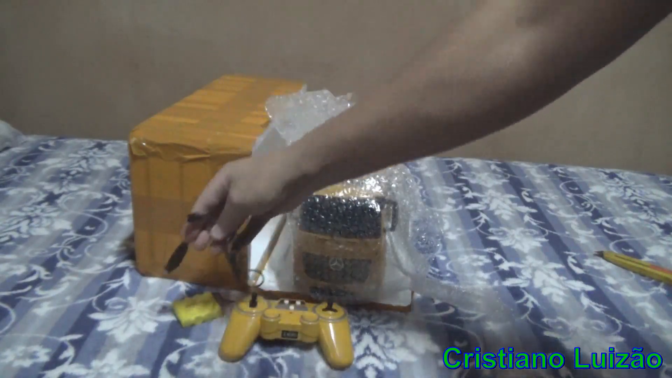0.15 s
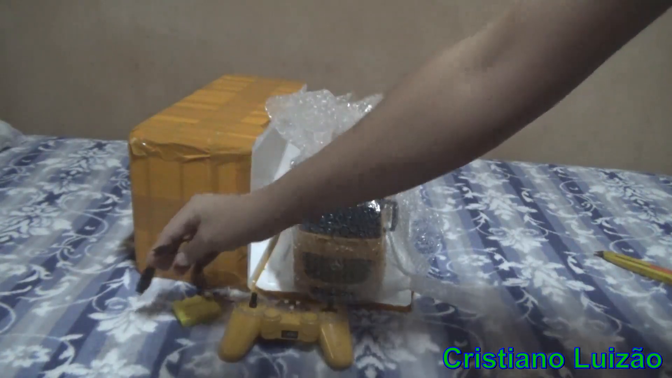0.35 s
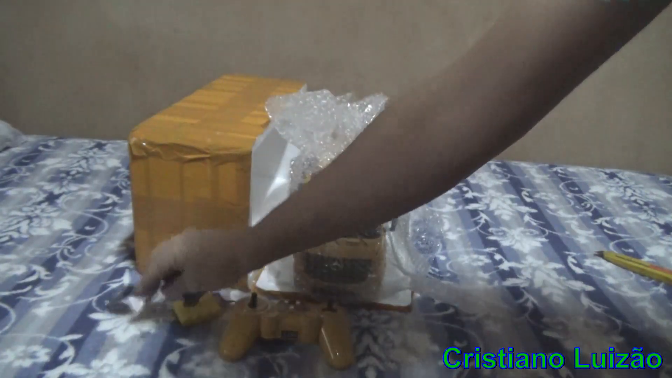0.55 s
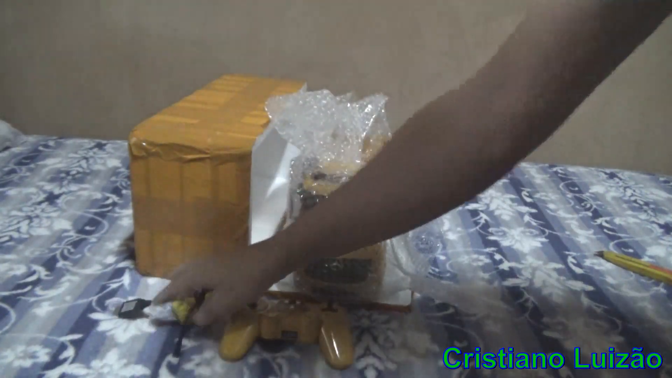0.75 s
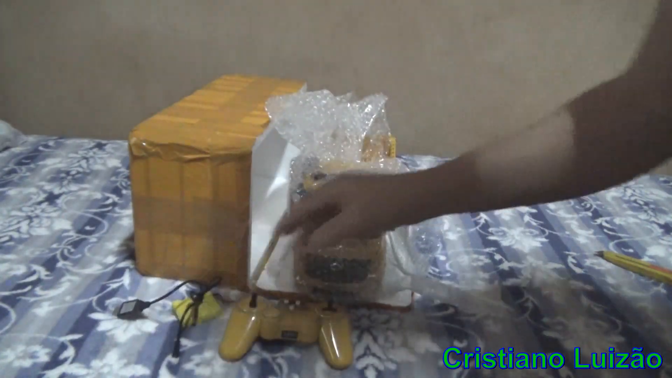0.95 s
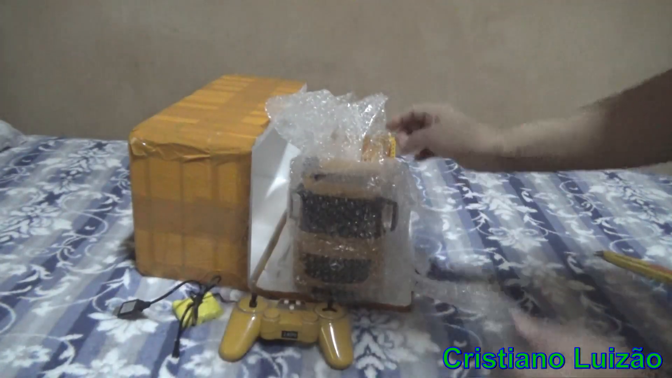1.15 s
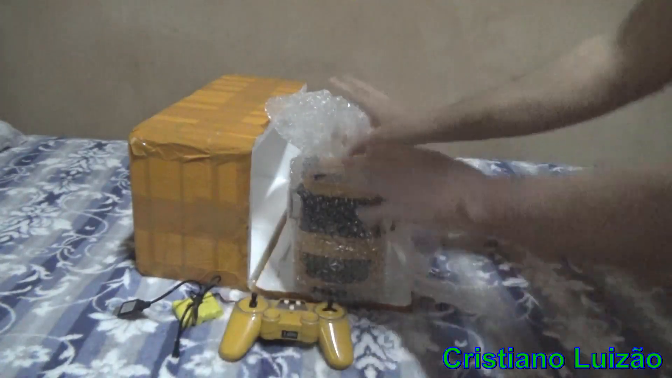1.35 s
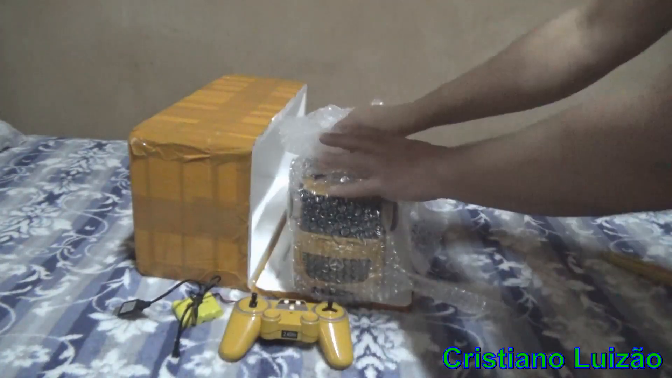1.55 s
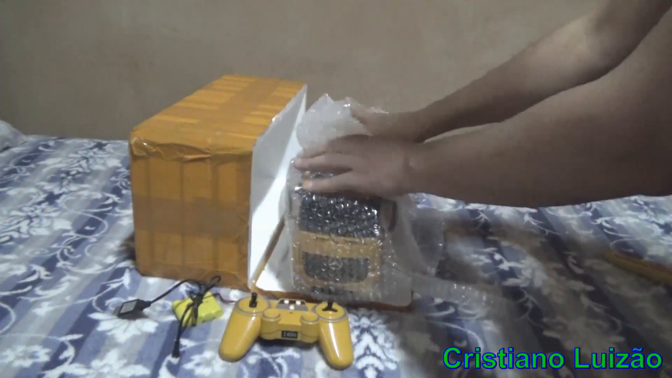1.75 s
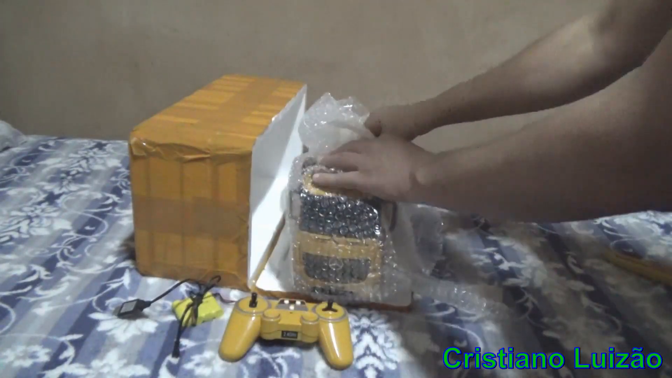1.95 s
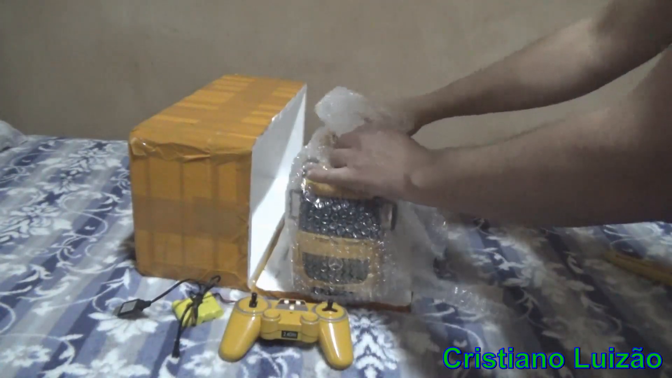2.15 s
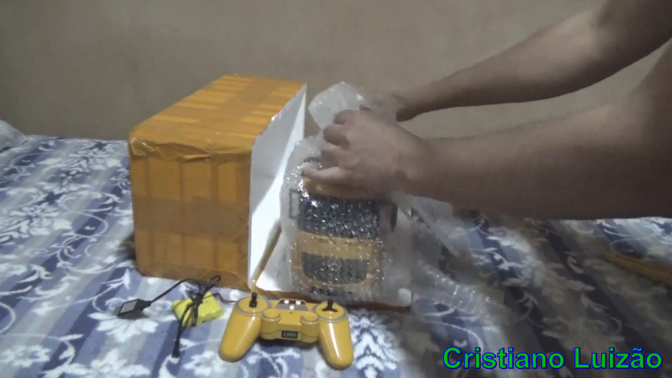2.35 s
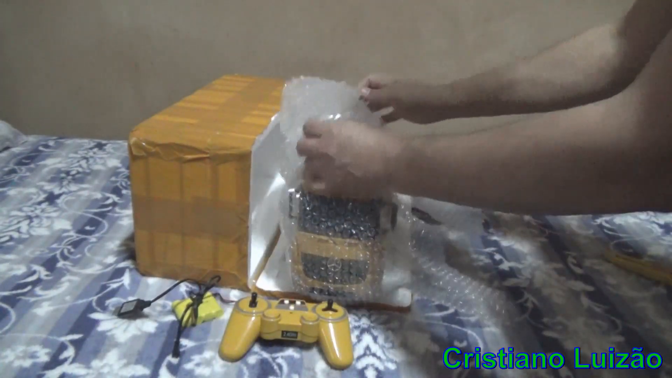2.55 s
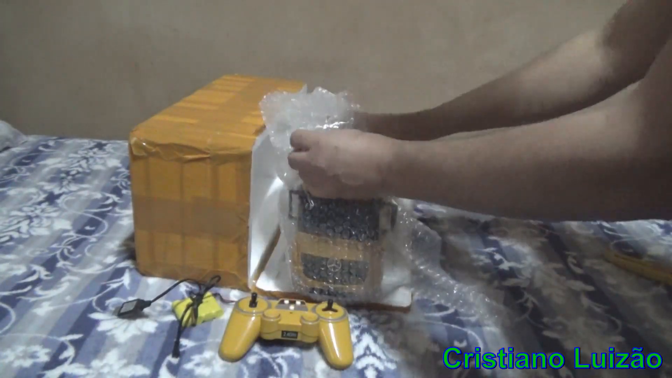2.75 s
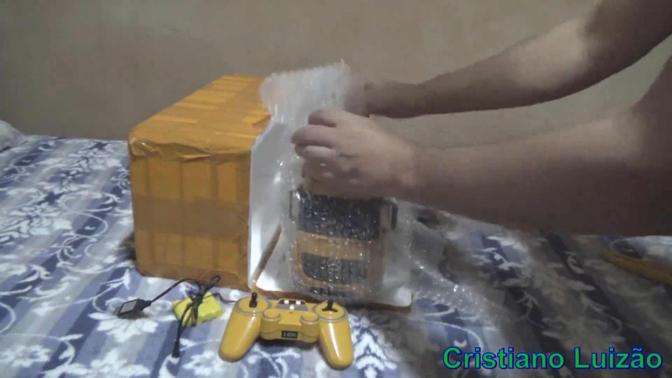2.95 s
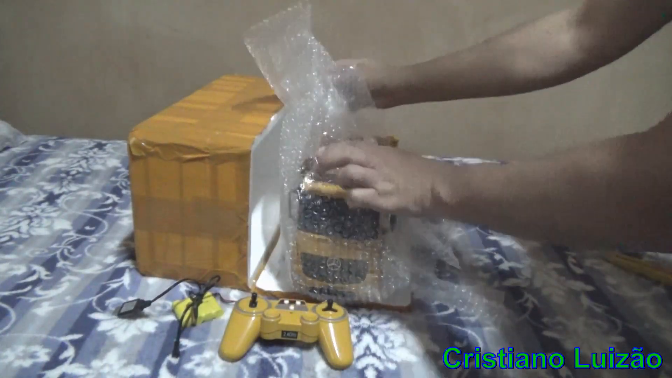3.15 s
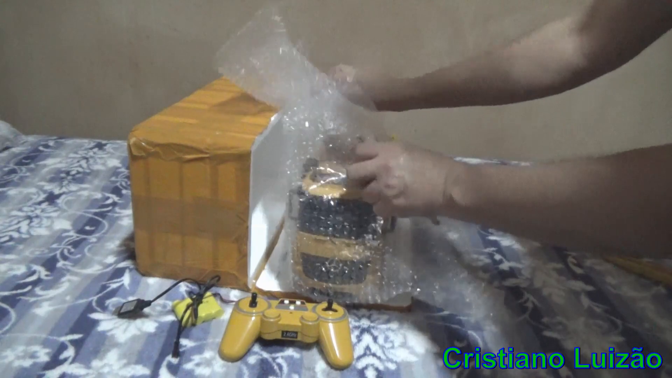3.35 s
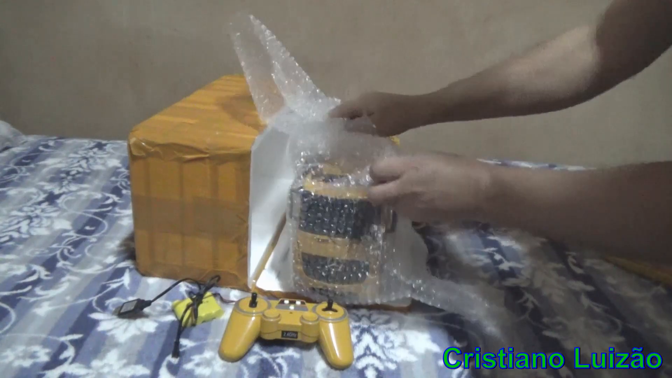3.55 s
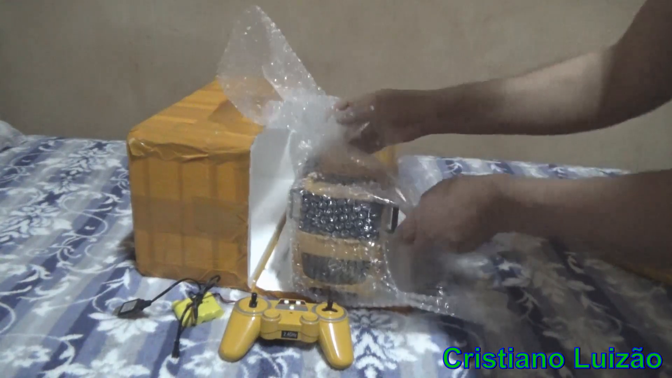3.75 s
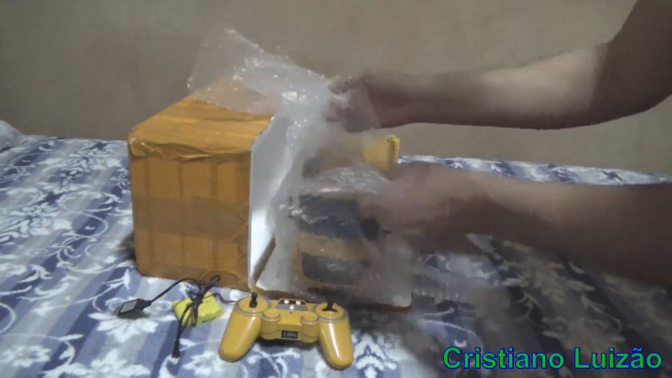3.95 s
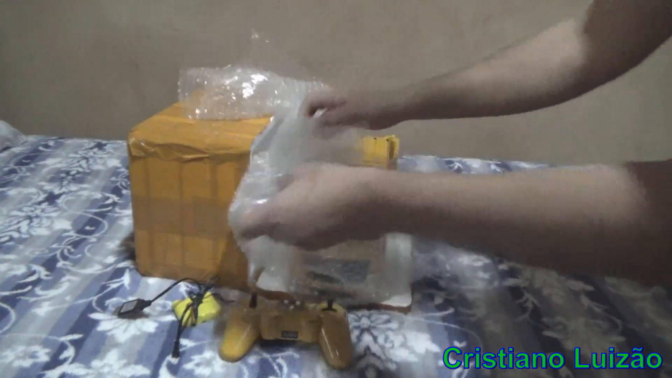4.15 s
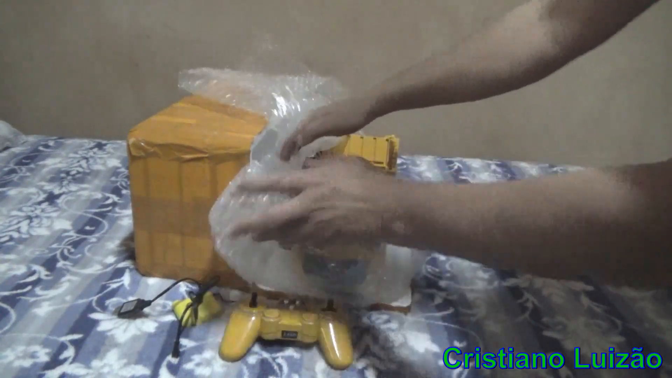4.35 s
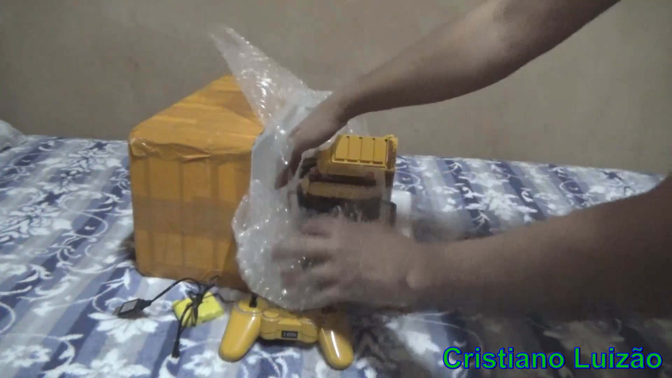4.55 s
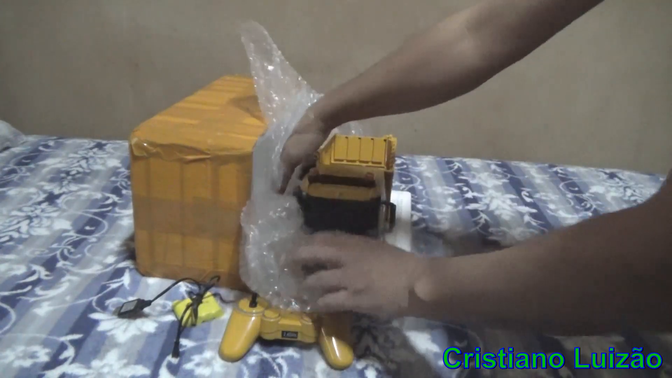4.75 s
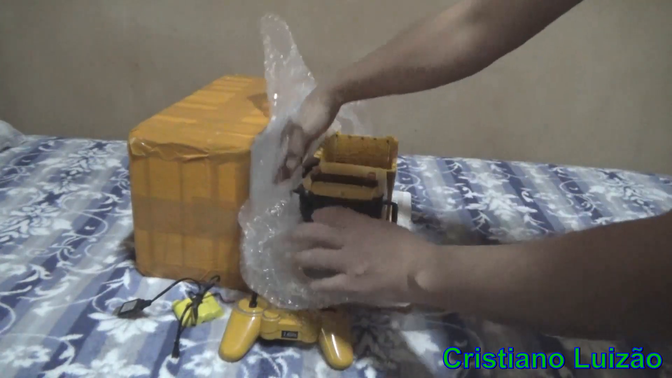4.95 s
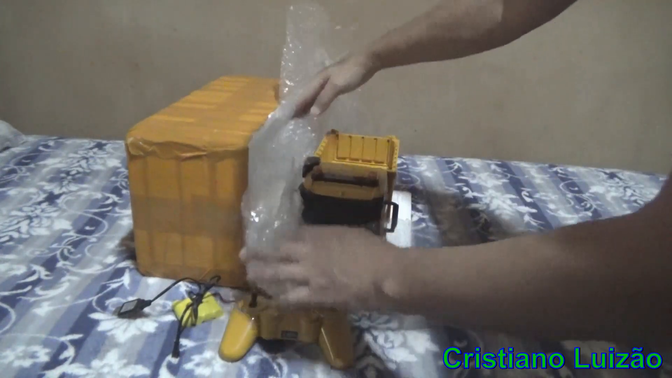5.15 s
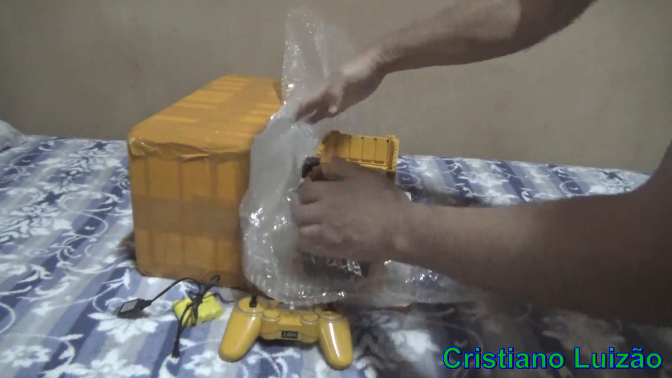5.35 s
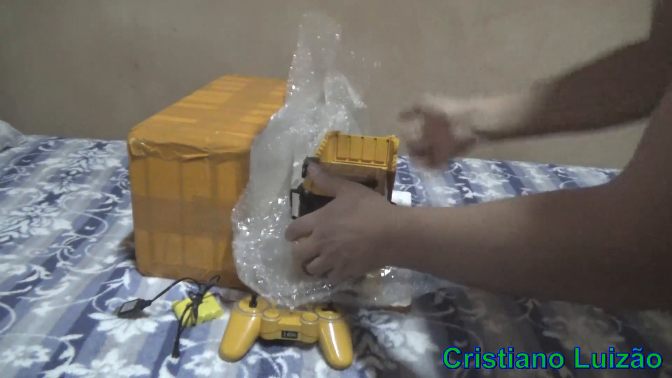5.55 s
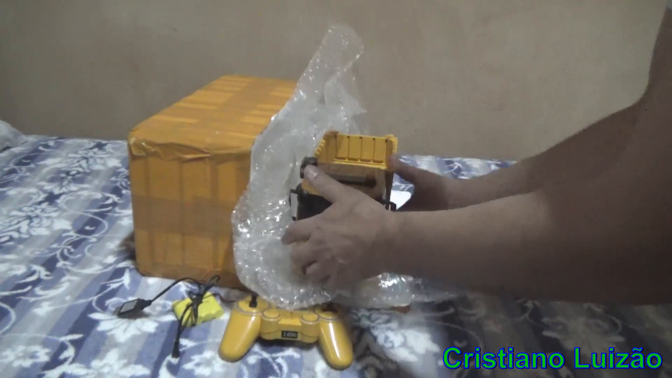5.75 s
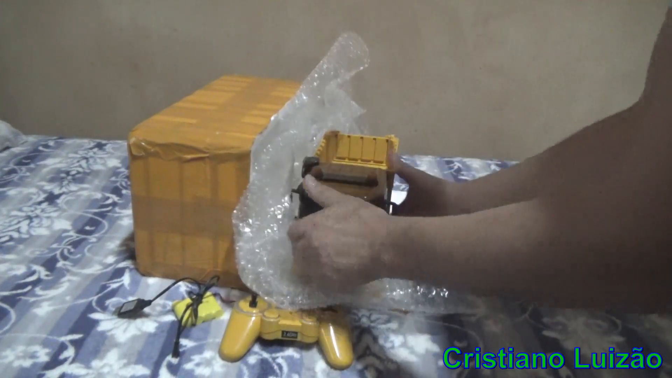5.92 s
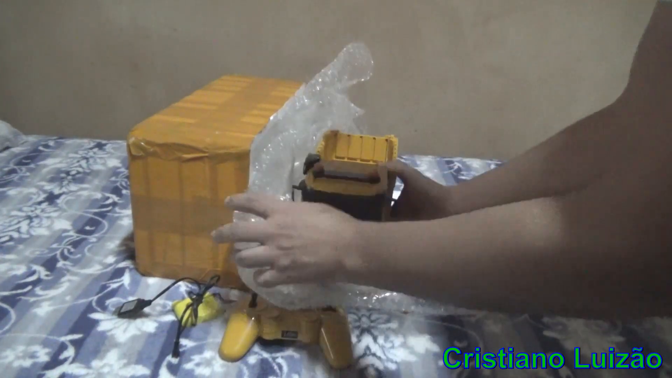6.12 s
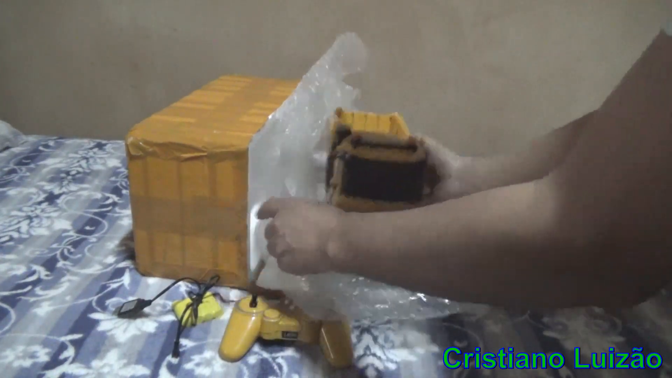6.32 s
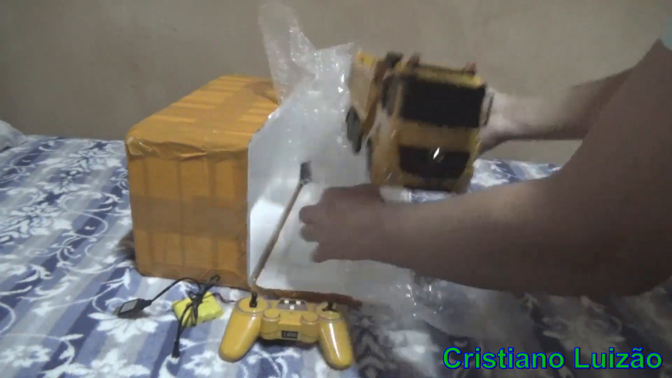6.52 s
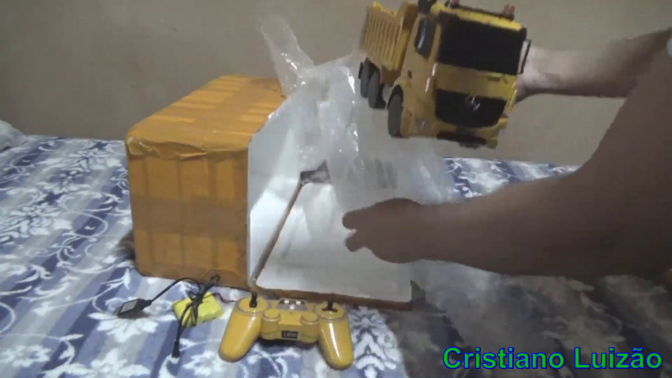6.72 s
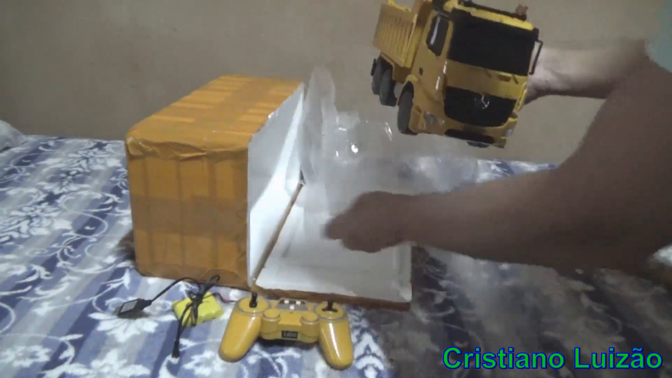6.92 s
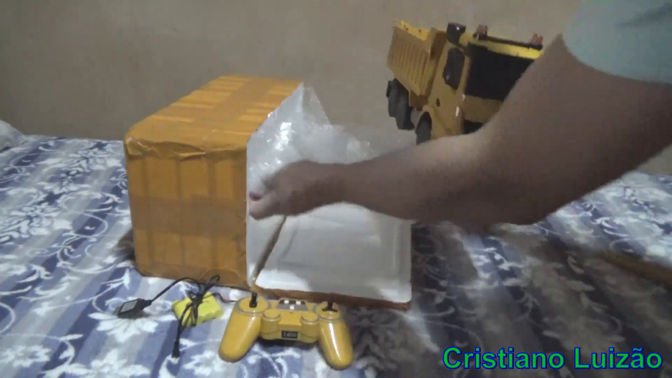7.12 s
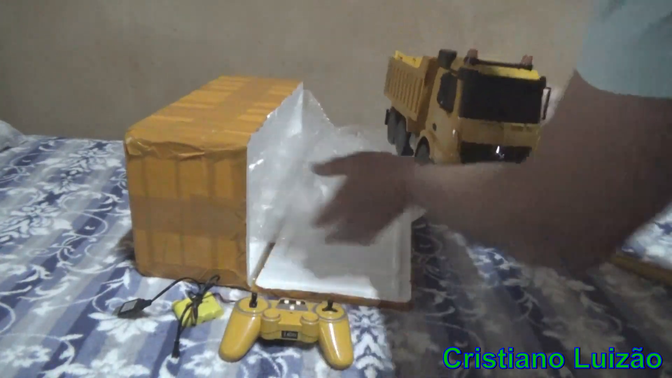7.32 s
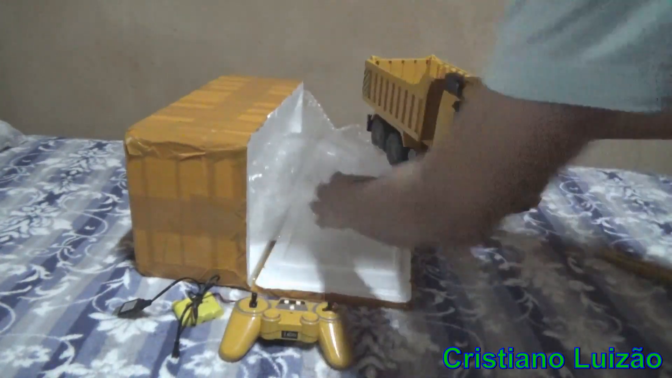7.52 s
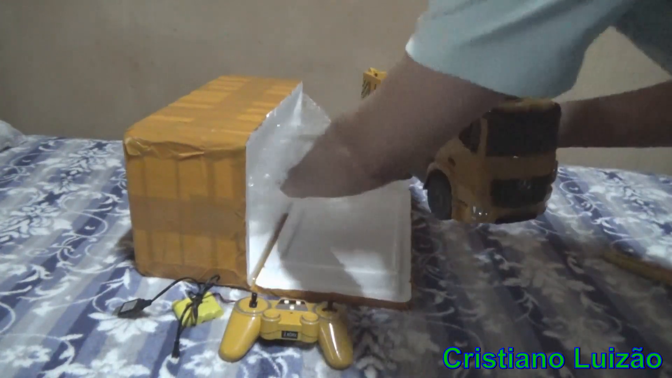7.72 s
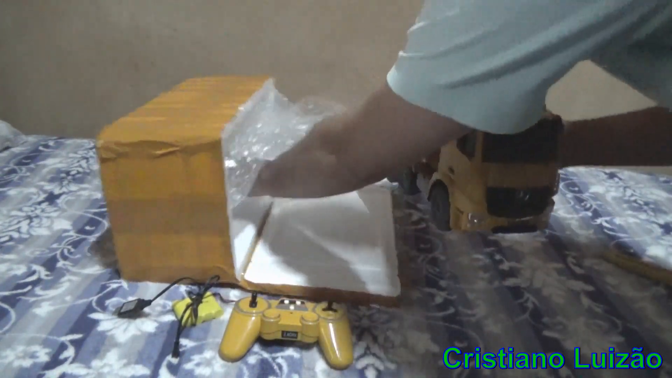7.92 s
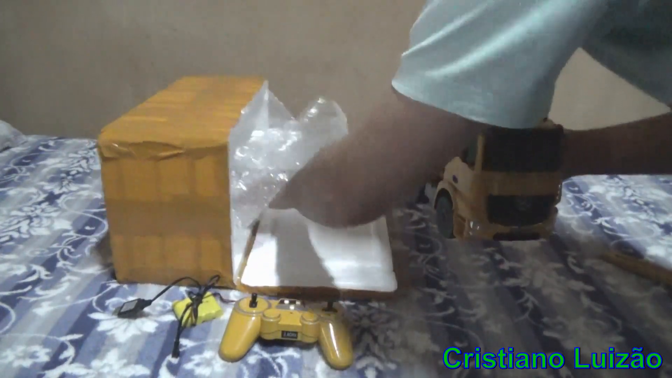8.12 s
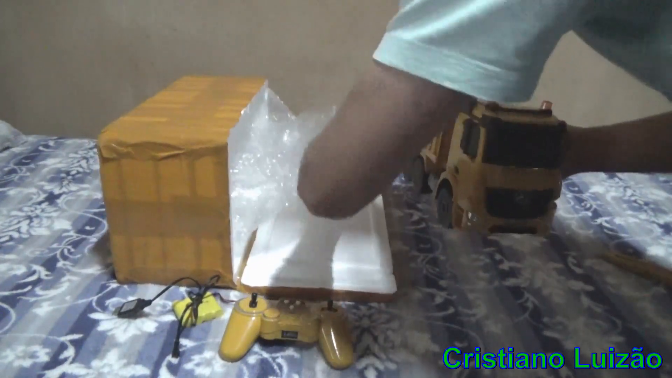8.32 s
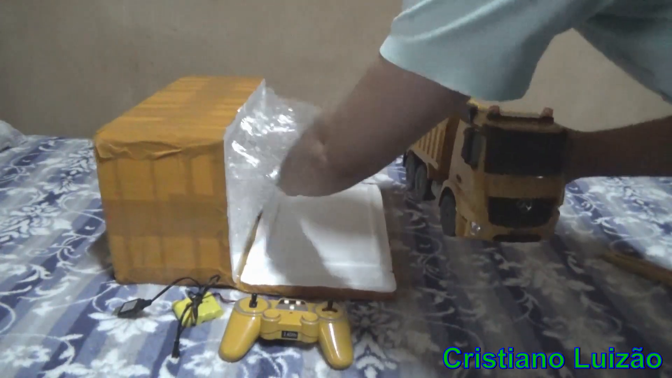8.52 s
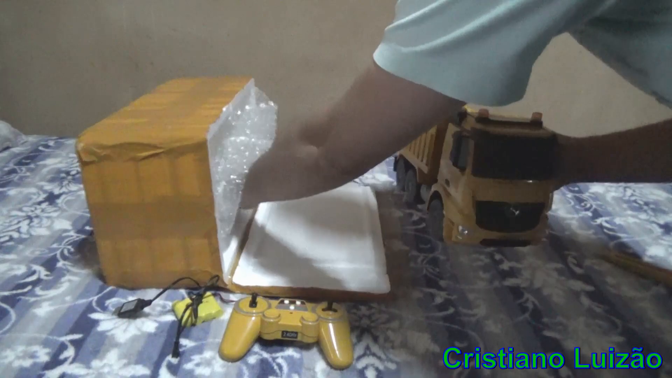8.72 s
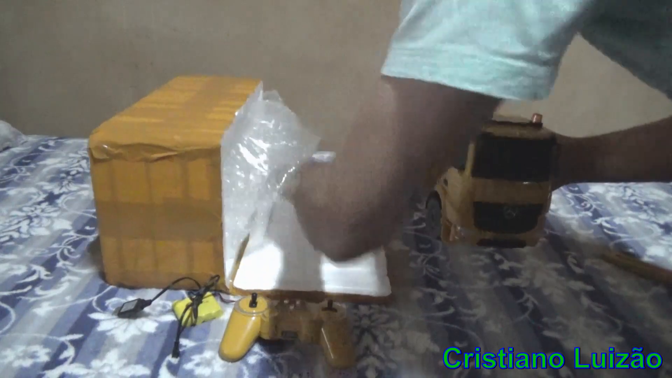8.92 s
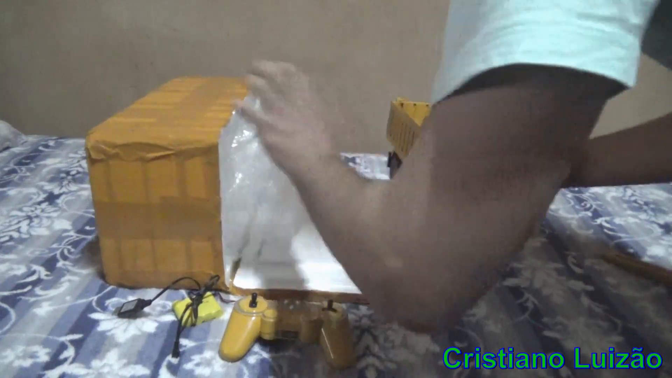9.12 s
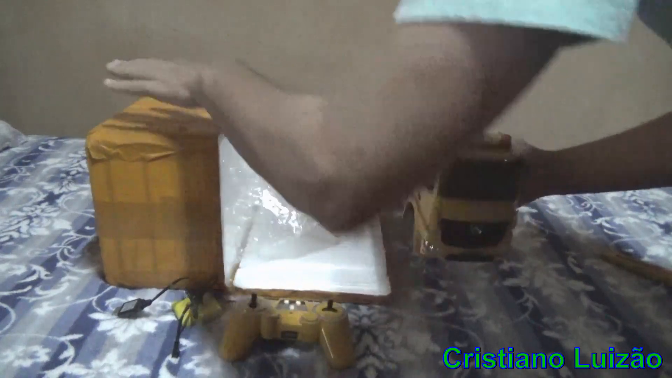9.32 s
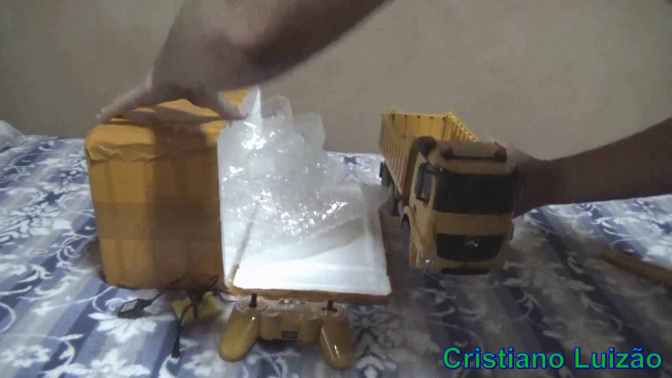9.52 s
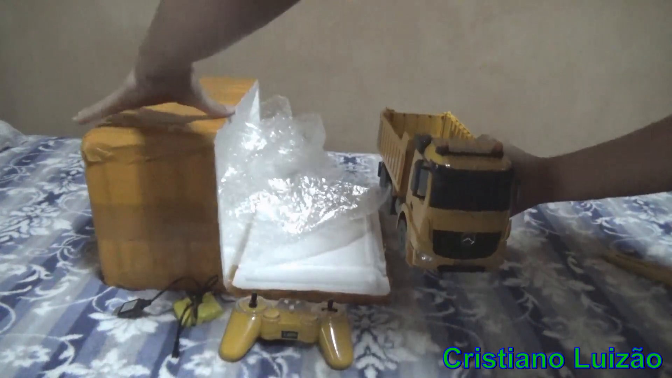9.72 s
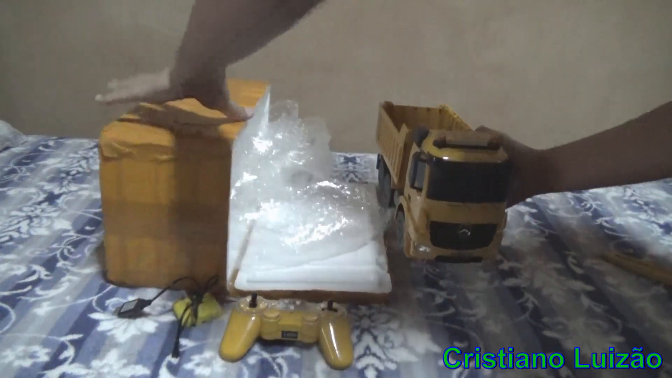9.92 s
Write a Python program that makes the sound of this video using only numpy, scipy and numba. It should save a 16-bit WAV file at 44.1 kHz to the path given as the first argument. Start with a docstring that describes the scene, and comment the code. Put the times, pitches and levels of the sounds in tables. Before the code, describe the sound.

In a quiet bedroom, close to a small camera, a little cable plug is set down with a few light ticks. Hands then grip bubble wrap, which crackles in thousands of tiny bright clicks, swelling to a sharp burst near the middle. Hollow toy and box knocks punctuate the grabs. The film is crumpled again, then thins to scattered crackles over soft hush and faint hum.

```python
"""Bubble wrap, pulled off a toy truck by hand on a bed, a metre from a small camera in a quiet bedroom.
The film buckles in thousands of tiny ringing clicks; single folds snap and sudden grabs shower clicks.
Toy and box knock as banks of damped modes; before that a small cable and plug are laid down with ticks.
Underneath lie a sine of mains hum, a faint periodic camera tick and the room's hush of shaped noise."""
import sys
import numpy as np
from scipy import signal
from scipy.fft import rfft, irfft
from scipy.io import wavfile
from scipy.ndimage import uniform_filter1d
from numba import njit

SR = 44100
rng = np.random.default_rng(int(sys.argv[2]) if len(sys.argv) > 2 else 0)


def wav_record(signal):
    """Record a signal, one row per channel, as 16-bit PCM in the file named by sys.argv[1]."""
    frames = np.transpose(np.atleast_2d(signal))
    bounded = np.clip(frames, -1, 1)
    # unit amplitude maps onto the largest positive 16-bit level
    quanta = np.round(bounded * 32767).astype(np.int16)
    wavfile.write(sys.argv[1], SR, quanta)


N = 439677  # length in samples

# Spectrum of the room hush. Each row: frequency in Hz, relative gain in dB.
HUSH_SPECTRUM = [(12, -71), (20, -21), (86, -13), (110, -16), (130, -6), (154, -10.5), (399, -2.5),
                 (698, -7), (923, -2), (1760, -10.5), (7730, -16), (14700, -23), (16000, -28)]
# Spectrum of the left-right part of echoes and hush. Each row: frequency in Hz, gain in dB.
SIDE_SPECTRUM = [(60, -1), (130, -27), (300, -17.5), (700, -12.5), (1300, -12.5), (2400, -10), (4400, -12),
                 (6000, -19), (8000, -63.5), (12000, -24.5)]
# The plug ticks down. Each row: start in seconds, level in dB, brightness in dB per octave.
PLUG_TICKS = [(0.491, -44, -8), (0.5766, -22.5, 3), (0.6197, -27, 1), (0.661, -34, 6), (0.69, -28.5, 5)]
# Modes of the small hard plug. Each row: frequency in Hz, level in dB, T60 in seconds.
PLUG_MODES = [(2160, -4, 0.0075), (3900, 1.5, 0.0068), (5530, 3.5, 0.0056), (6800, 0, 0.0058),
              (8550, -5, 0.0063), (10200, -5, 0.0048)]
# The plug slides and rings faintly. Each row: time in seconds, level in dB.
PLUG_SLIDE = [(0, -71), (.15, -61.5), (.3, -78), (.4, -95)]
# Knocks of toy and box. Each row: start in seconds, level in dB, pitch in Hz.
TOY_KNOCKS = [(1.1777, -42, 2000), (1.5721, -31.5, 1830), (1.7646, -21.5, 1690), (1.9144, -30, 2110),
              (2.353, -22.5, 1010), (2.385, -31, 520), (2.5089, -23.5, 1300), (2.6019, -18.5, 1840),
              (2.8067, -12.5, 820), (2.837, -30, 755), (2.9217, -16.5, 744), (3.0963, -16.5, 990),
              (3.1448, -24, 1900), (3.2037, -23.5, 2120), (4.0194, -26, 2040), (4.7381, -9.5, 630),
              (4.759, -18, 423), (4.9587, -20.5, 720), (5.153, -19.5, 410), (5.444, -33, 216),
              (5.7767, -18.5, 530), (5.8004, -24, 560), (5.8363, -28, 630), (6.018, -36, 304),
              (6.1226, -13.5, 870), (6.9028, -26, 2190), (7.0273, -21, 1970), (7.068, -22.5, 1390),
              (7.0865, -46, 2190), (7.4042, -20, 470), (7.4258, -13, 1160), (7.4694, -17, 1700),
              (7.492, -22.5, 1000), (8.2722, -36, 2040), (8.432, -23.5, 2110), (8.741, -28, 290),
              (8.9194, -26.5, 800), (9.6108, -18.5, 840), (9.7306, -26.5, 424), (9.8446, -27, 606),
              (9.8863, -27.5, 1300)]
# Modes of the box. Each row: frequency in Hz, relative level in dB.
BOX_MODES = [(210, -11.5), (300, -0.5), (390, -2.5), (474, 0.5), (610, 1.5), (720, 2.5), (975, 2.5),
             (1174, 1.5), (1448, 7), (1647, 0.5), (1950, 11), (2350, 6.5), (2640, -20)]
# The loudest single folds that snap. Each row: start in seconds, level in dB, pitch in Hz.
LOUD_SNAPS = [(1.1407, -13.5, 6160), (1.1803, -18, 7180), (1.4277, -38, 6660), (1.8058, -28, 7490),
              (1.8953, -29, 6170), (2.2668, -19, 6260), (2.5871, -33, 6810), (2.6138, -18, 7860),
              (2.6346, -18, 5870), (2.809, -20, 4160), (2.8963, -11.5, 7640), (3.0176, -22, 6390),
              (3.3807, -18, 5930), (3.5249, -17, 5000), (3.8746, -17, 6350), (4.0046, -18, 5460),
              (4.1237, -16, 6250), (4.2038, -22, 5650), (4.2266, -13, 5200), (4.4341, -13, 6520),
              (4.4409, -17, 6640), (4.469, -23, 5710), (4.4785, -13, 6210), (4.5674, -11, 7400),
              (4.7042, -8, 6900), (4.7144, -8, 5620), (4.7305, -7, 6600), (4.739, -2, 6340),
              (4.802, -12, 6980), (4.8192, -19, 5580), (4.8524, -24, 6070), (4.9019, -25, 6360),
              (5.2242, -11, 6450), (5.2772, -22, 6180), (5.284, -16, 5130), (5.3952, -26, 5760),
              (5.4104, -21, 5410), (5.4229, -26, 5460), (5.4789, -21, 6790), (5.594, -18, 7040),
              (5.6054, -30, 6150), (5.6256, -17.5, 7100), (5.6398, -20, 7030), (5.6654, -30, 6550),
              (5.6758, -22, 7290), (5.7095, -21, 5900), (5.7554, -21, 8590), (5.7966, -30, 6710),
              (5.8373, -20, 5340), (5.8549, -29, 7010), (5.9625, -19, 7650), (5.9793, -13, 7800),
              (6.1278, -22.5, 3600), (6.2032, -14, 8600), (6.2501, -30, 6560), (6.2704, -16, 6870),
              (6.5702, -13, 6540), (6.5923, -18, 6780), (6.8861, -18, 6150), (6.9055, -23, 5650),
              (6.9172, -28, 5890), (7.0555, -14, 5300), (7.2642, -16, 7510), (7.2781, -26, 7330),
              (7.3867, -26, 6250), (7.4051, -14, 6070), (7.432, -21, 5010), (7.5498, -13.5, 7700),
              (7.5746, -16, 7930), (7.5914, -15, 6150), (7.6035, -12.5, 7860), (7.6223, -30, 7090),
              (7.7061, -20, 6570), (8.0788, -17, 5340), (8.1703, -22, 7500), (8.278, -18, 8700),
              (8.3891, -16, 7700), (8.428, -11.5, 5740), (8.5962, -8, 7450), (8.8074, -34, 6600),
              (9.0035, -24, 7220), (9.0581, -27, 7700), (9.2159, -34, 6770), (9.2987, -32, 5230),
              (9.392, -34.5, 5250), (9.4627, -27, 6400), (9.4754, -39, 5710), (9.6115, -21, 3920),
              (9.8301, -28, 6380), (9.8446, -16, 5670), (9.8563, -20, 7000), (9.8691, -22, 7840),
              (9.8873, -16, 6540)]
# Sudden grabs, each a fading shower of clicks. Each row: start in seconds, level in dB, pitch in Hz.
SUDDEN_GRABS = [(1.1276, -24, 6400), (1.4278, -42, 8100), (1.4406, -36, 6200), (1.692, -16, 3500),
                (1.7494, -30, 4610), (2.604, -16, 7340), (2.807, -7, 3500), (2.8955, -20, 6000),
                (3.096, -20, 4790), (4.7387, 8, 7440), (4.9593, -1.5, 2540), (5.1368, -4, 5670),
                (5.709, -31, 5800), (5.7545, -35, 7000), (5.777, -5.5, 3820), (6.125, -0.5, 2980),
                (6.201, -17, 5000), (6.8847, -27, 7320), (6.9056, -8, 3380), (6.9164, -21, 3380),
                (7.4047, -4, 3500), (7.466, -11, 4330), (7.5487, -23, 8340), (8.364, -20, 6050),
                (8.384, -7, 7610), (8.5006, 0, 5820), (9.057, -16, 7500), (9.157, -13, 5230),
                (9.6122, -7, 2350), (9.722, -31, 4430), (9.845, -16, 5040), (9.886, -18, 6000)]
# How hard the hands work the wrap, one table for each grip.
# Each row: time in seconds, crackle level in dB, level in dB of the low rustle of wrap on box and toy.
GRIPS = [
    [(1.13, -34, -67), (1.138, -37, -67), (1.172, -40, -65), (1.186, -38.5, -64), (1.212, -56, -67),
     (1.27, -66, -76), (1.42, -65, -71)],
    [(1.43, -55, -69), (1.472, -43.5, -55), (1.548, -38.5, -52), (1.636, -43.5, -58.5), (1.784, -36, -51),
     (1.926, -39, -48.5), (2.02, -48.5, -64)],
    [(2.03, -44, -54), (2.142, -39, -51.5), (2.458, -40, -51), (2.544, -37, -52), (2.596, -41, -50),
     (2.6, -36.5, -50), (2.8, -47.5, -56)],
    [(2.81, -37.5, -48), (2.824, -39, -37), (2.92, -37, -54), (3.006, -40, -46), (3.122, -34, -53),
     (3.294, -42.5, -54), (3.3, -39, -52)],
    [(3.31, -38.5, -59), (3.376, -34, -47.5), (3.57, -36, -48), (3.728, -33, -48), (3.952, -37.5, -54),
     (4.042, -33.5, -49), (4.3, -32, -46.5)],
    [(4.31, -32, -47), (4.388, -37, -46), (4.426, -33.5, -46), (4.664, -33, -35), (4.733, -28.5, -42)],
    [(4.745, -30.5, -43), (4.767, -30.5, -41), (4.925, -43.5, -51), (4.95, -39, -55)],
    [(4.96, -47, -53), (4.972, -37.5, -40), (5.114, -39, -49.5), (5.162, -29, -41.5), (5.29, -35, -39.5),
     (5.298, -39, -53), (5.33, -43.5, -57)],
    [(5.34, -42, -53), (5.436, -37.5, -45.5), (5.582, -45.5, -58), (5.594, -42.5, -56), (5.724, -47.5, -65),
     (5.732, -56, -61), (5.77, -45.5, -55)],
    [(5.78, -43, -39), (5.928, -48, -57.5), (5.98, -41.5, -52.5), (5.996, -48, -55), (6.018, -38.5, -60),
     (6.082, -52.5, -51), (6.118, -49, -55)],
    [(6.13, -47, -52), (6.158, -47, -45), (6.186, -46, -47), (6.195, -37, -52)],
    [(6.205, -34, -45), (6.295, -34.5, -48.5), (6.443, -33, -50), (6.483, -39, -50.5), (6.713, -34, -47.5),
     (6.787, -41.5, -54), (6.84, -40, -52)],
    [(6.85, -41.5, -49), (6.92, -30, -57), (6.932, -35, -52), (7.056, -25.5, -40), (7.134, -34.5, -49),
     (7.226, -33, -46.5), (7.395, -48.5, -56)],
    [(7.405, -35.5, -47), (7.463, -38.5, -54), (7.471, -28.5, -52), (7.497, -39, -62), (7.545, -35.5, -53),
     (7.549, -33.5, -50.5), (7.75, -40, -49.5)],
    [(7.76, -39, -49), (7.792, -33, -46), (7.926, -28.5, -37), (7.96, -36, -45.5), (8.178, -39.5, -52.5),
     (8.306, -46, -60), (8.36, -54, -57)],
    [(8.37, -37, -55), (8.428, -31.5, -46), (8.466, -43.5, -54), (8.564, -29.5, -45.5),
     (8.638, -33.5, -42.5), (8.754, -31, -42.5), (8.78, -37, -43)],
    [(8.79, -40.5, -50.5), (8.97, -41.5, -47.5), (9.024, -39.5, -63), (9.038, -47, -56), (9.06, -36.5, -67),
     (9.092, -46.5, -64), (9.15, -51, -60)],
    [(9.16, -42, -61), (9.258, -55, -61.5), (9.452, -56, -64), (9.458, -54, -64), (9.526, -59.5, -62),
     (9.605, -52.5, -56)],
    [(9.615, -39.5, -59), (9.651, -58, -53), (9.741, -46.5, -54), (9.791, -62, -58), (9.837, -50, -66),
     (9.845, -40.5, -52), (9.97, -60, -58)],
]
# Spectrum of the film's crackle. Each row: frequency in Hz, relative gain in dB.
FILM_SPECTRUM = [(410, -19.5), (700, -6.5), (922, -4), (1170, -1), (1970, 5), (2460, 2.5), (4210, 5),
                 (8310, 6), (10700, 4.5), (15200, -4.5), (16000, -36)]
# Spectrum of the low rustle. Each row: frequency in Hz, relative gain in dB.
RUSTLE_SPECTRUM = [(35, -87), (60, -7), (178, -10), (215, -4.5), (309, -2.5), (392, -3), (445, -3.5),
                   (590, 0.5), (904, 0.5), (1960, -5.5), (2600, -4), (3380, -11), (5720, -120)]
# How the finest crackle comes and goes. Each row: time in seconds, level in dB against the lower crackle.
FINE_CRACKLE = [(1.12, -16), (1.5, -17), (2.4, -31), (2.9, -22.5), (4, -16.5), (4.6, -10.5), (5.1, -18.5),
                (5.7, -11), (6.1, -20), (6.4, -12.5), (7.1, -19.5), (7.45, -25), (7.6, -6.5), (8, -25.5),
                (8.5, -10), (8.75, -26), (9.1, -7.5), (9.5, -23), (9.97, -9)]

HUM_HZ, HUM_RMS_DB = 119.9, -80
FRAME_S, FRAME_START_S = 1 / 29.97, .0311  # the camera ticks faintly once a frame
HUSH_RMS_DB = -62.5
ROOM_T60_S, ROOM_DB = .28, -10
TOP_HZ = 15800
KNOCK_T60_S = 0.091  # at 600 Hz
BOUNCE_S, BOUNCE_DB = .011, -2.5  # every blow bounces once
GRAB_T60_S = 0.11
# smaller snaps at random: rate, dB above the crackle curve before the snap trims, spread in dB, pitch
SMALL_PER_S, SMALL_DB, SMALL_SPREAD_DB, SMALL_HZ = 30, 4, 1, 6250


def undb(db):
    """Decibels to amplitude."""
    return 10 ** (np.asarray(db) / 20)


def unit(x):
    """Scale a signal to an RMS of one."""
    return x / np.sqrt(np.mean(x ** 2))


def sample(s):
    """Seconds to sample index."""
    return (np.asarray(s) * SR).astype(np.int64)


def curve(s, db):
    """Amplitude over time, drawn straight in dB between points and all but silent before the first."""
    return undb(np.interp(np.arange(N) / SR, s, db, left=-150))


def colour(x, table):
    """Causal filter with the gain of a (Hz, dB) table, from the folded cepstrum."""
    hz, db = np.transpose(table)
    grid = np.arange(1025) * SR / 2048 + 1  # one Hz up, to keep the logarithm finite
    gain = undb(np.interp(np.log(grid), np.log(hz), db))
    cepstrum = irfft(np.log(gain))
    cepstrum[1:1024] *= 2
    cepstrum[1025:] = 0
    impulse = irfft(np.exp(rfft(cepstrum)))
    return signal.fftconvolve(x, impulse)[:len(x)]


@njit
def rings(at, hz, t60, size, count):
    """A damped vibration for each grain, played until it has fallen 50 dB."""
    y = np.zeros(count)
    for k in range(len(at)):
        step = np.exp(2j * np.pi * hz[k] / SR - np.log(1000) / (t60[k] * SR))
        z = size[k] + 0j
        for i in range(at[k], min(count, at[k] + int(t60[k] * SR * 5 / 6))):
            z *= step
            y[i] += z.imag
    return y


def mains_hum():
    """Mains hum as one steady sine."""
    return undb(HUM_RMS_DB) * np.sqrt(2) * np.sin(2 * np.pi * HUM_HZ * np.arange(N) / SR)


def camera_tick():
    """A tiny electrical tick at the frame rate, each a short damped ring."""
    at = sample(np.arange(FRAME_START_S, N / SR, FRAME_S))
    one = np.ones(len(at))
    return rings(at, 3050 * one, 0.0045 * one, undb(-58) * one, N)


def room_hush():
    """Steady air of the room as filtered white noise."""
    return unit(colour(rng.standard_normal(N), HUSH_SPECTRUM)) * undb(HUSH_RMS_DB)


def room(x):
    """Decaying noise as the echo of walls, duller as it fades; the echo drifts steadily between two patterns."""
    t = np.arange(SR // 3) / SR
    turn = np.pi * np.arange(N) / SR / .4  # one full turn in 0.8 s
    out = 0
    for share in (np.sin(turn), np.cos(turn)):
        noise = rng.standard_normal(len(t))
        dull = uniform_filter1d(noise, size=5)
        bright = (noise - dull) * np.exp(-t / 0.54)
        tail = (dull + bright) * undb(-60 * t / ROOM_T60_S) * (t > .003)
        tail = tail / np.sqrt(np.sum(tail ** 2))
        out = out + signal.oaconvolve(x * share, tail)[:N]
    return out


def struck(events, weight_db, hz, t60):
    """Every blow rings all modes with its own signs, slightly shifted pitches and tiny delays."""
    g = rng.standard_normal(weight_db.shape + (3,))
    at = events[:, :1] + .0007 * np.abs(g[..., 2])
    size = undb(events[:, 1:2] + weight_db) * np.sign(g[..., 0])
    pitch = hz * (1 + .02 * g[..., 1])
    return rings(sample(at).ravel(), pitch.ravel(), (t60 + 0 * size).ravel(), size.ravel(), N)


def plug():
    """Ticks and a faint slide excite the same small hard part."""
    events, (hz, db, t60) = np.array(PLUG_TICKS), np.transpose(PLUG_MODES)
    tilt_db = events[:, 2:3] * np.log2(hz / 5000)
    ticks = struck(events, db + tilt_db - 15.5, hz, t60)
    # the slide: many grains in the first half second, on the three lowest modes
    u = rng.random((3000, 2)).T
    mode = (u[1] * 3).astype(np.int64)
    slide = rings(sample(u[0] / 2), hz[mode], 1.3 * t60[mode], undb(-4.0 * mode), N)
    slide = slide / np.std(slide[:SR // 2])
    return ticks + slide * curve(*np.transpose(PLUG_SLIDE))


def knocks():
    """Box modes near the pitch of each blow ring loudest; high ones die sooner; a short crack leads."""
    blows, (hz, db) = np.array(TOY_KNOCKS), np.transpose(BOX_MODES)
    events = np.concatenate([blows, blows + [BOUNCE_S, BOUNCE_DB, 0]])
    blow_hz = events[:, 2:3]
    near_db = -9.0 * np.abs(np.log2(hz / blow_hz))
    ring = struck(events, db + near_db - 18.5, hz, KNOCK_T60_S * (600 / hz) ** 0.75)
    crack_hz = blow_hz * np.array([1.3, 1.8, 2.5, 3.4])
    crack = struck(events, 0 * crack_hz - 12.0, crack_hz, 12 / crack_hz)
    return ring + crack


def shower(s, db, hz, t60, fall_db, octaves, cycles, count):
    """Short rings spread evenly round a pitch, of equal energy but for a fade over time by fall_db."""
    s, db, hz, t60 = (np.repeat(c, count) for c in np.broadcast_arrays(s, db, hz, t60))
    u = rng.random((len(s), 3)).T
    slot = (np.arange(len(s)) % count + u[0]) / count - .5
    pitch = np.clip(hz * 2 ** (octaves * slot), 300, 15000)
    size = undb(db - fall_db * u[1]) * np.sqrt(pitch / hz) * np.sign(u[2] - .5)
    at = sample(s + u[1] * t60 * fall_db / 60)
    return rings(at, pitch, cycles / pitch, size, N)


def small_snaps():
    """Random lesser folds, whose level follows the crackle; returns rows like those of the loud snaps."""
    u = rng.random((SMALL_PER_S * N // SR, 3)).T
    s = u[0] * N / SR
    grip_s, film_db, _ = np.concatenate(GRIPS).T
    rarity = np.minimum(-np.log(1 - u[1]), 2)
    db = np.interp(s, grip_s, film_db, left=-150) + SMALL_DB + SMALL_SPREAD_DB * rarity
    return np.array([s, db, SMALL_HZ * 2 ** (1.06 * u[2] - .3)]).T


def snaps():
    """A snap is over in a few milliseconds and leaves after-clicks; a grab crackles longer."""
    s, db, hz = np.concatenate([LOUD_SNAPS, small_snaps()]).T
    snap = shower(s, db - 6.5, hz, .006, fall_db=6, octaves=1.3, cycles=13, count=8)
    after = shower(s, db - 12, hz, 0.035, fall_db=26.5, octaves=0.49, cycles=27, count=24)
    s, db, hz = np.transpose(SUDDEN_GRABS)
    grab = shower(s, db - 25, hz, GRAB_T60_S, fall_db=29, octaves=1.6, cycles=4.4, count=500)
    return signal.sosfilt(signal.butter(2, 12000, fs=SR, output="sos"), snap + after + grab)


def swarm(lo_hz, hi_hz, cycles, spread_db, loose, burst_s, count, size):
    """Clicks with an even spectrum, many small and few large. One buckle sets off its neighbours, so
    all but a loose share come in bursts of up to a given size that start sharply and share a colour."""
    u = rng.random((count, 5)).T
    burst = np.repeat(rng.random((count // size, 2)), size, axis=0).T
    alone = u[4] < loose
    burst_at = burst[0] * N / SR - burst_s * np.log(1 - u[0])
    s = np.where(alone, u[0] * N / SR, burst_at)
    place = np.where(alone, u[1], (burst[1] + 0.592 * u[1]) % 1)
    hz = lo_hz * (hi_hz / lo_hz) ** place
    rarity = np.minimum(-np.log(1 - u[2]), 5)  # a fold can only grow so large
    force = np.sign(u[3] - .5) * undb(spread_db * rarity) * hz / hi_hz
    return rings(sample(s), hz, cycles / hz, force, N)


def wrap():
    """Buckling film crackles; larger, slower folds rustle against box and toy."""
    s, film_db, low_db = np.concatenate(GRIPS).T
    clicks = swarm(507, 23100, cycles=3.14, spread_db=1.5, loose=.6, burst_s=.008, count=120000, size=60)
    film = colour(clicks, FILM_SPECTRUM)
    body = unit(signal.sosfilt(signal.butter(4, 10000, "low", fs=SR, output="sos"), film))
    fine = unit(signal.sosfilt(signal.butter(4, 10000, "high", fs=SR, output="sos"), film))
    folds = swarm(64, 3000, cycles=4.6, spread_db=1.5, loose=.7, burst_s=.02, count=20000, size=40)
    rustle = unit(colour(folds, RUSTLE_SPECTRUM))
    # the finest clicks come and go with how taut the film is
    crackle = body + fine * curve(*np.transpose(FINE_CRACKLE))
    return crackle * curve(s, film_db) + rustle * curve(s, low_db)


def scene():
    """Sources straight ahead; only echoes and hush differ left and right."""
    near = wrap() + snaps() + knocks() + plug()
    # small light things radiate no bass
    near = signal.sosfilt(signal.butter(4, 170, "high", fs=SR, output="sos"), near)
    mid = near + undb(ROOM_DB) * room(near) + room_hush() + mains_hum() + camera_tick()
    side = colour(room(near) + room_hush(), SIDE_SPECTRUM)
    return np.array([mid + side, mid - side])


def record(dry):
    """The camera cuts the top with a steep low-pass."""
    return signal.sosfilt(signal.ellip(10, .2, 70, TOP_HZ, fs=SR, output="sos"), dry)


dry = scene()
out = record(dry)
wav_record(out)
```